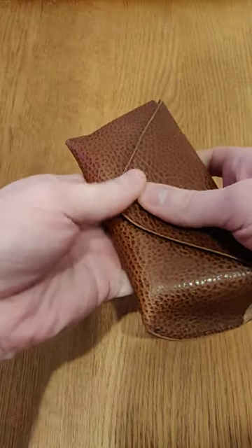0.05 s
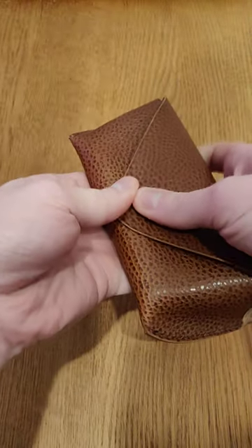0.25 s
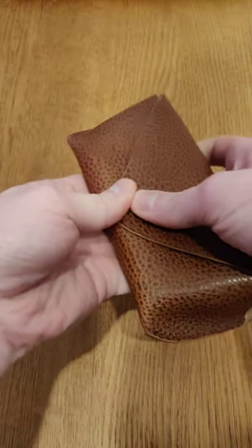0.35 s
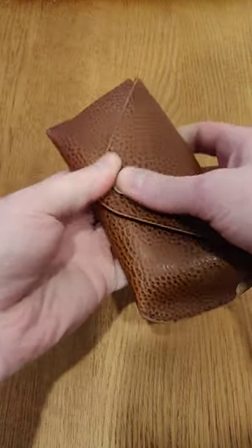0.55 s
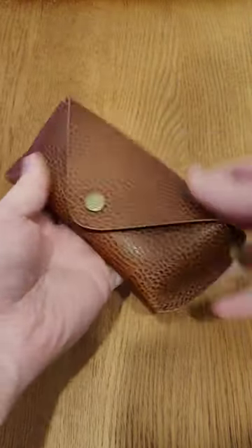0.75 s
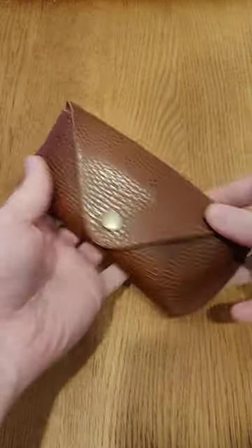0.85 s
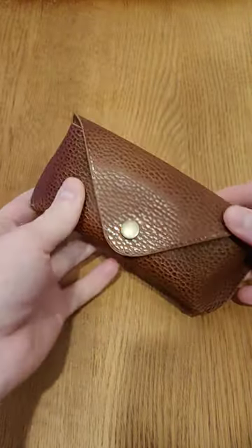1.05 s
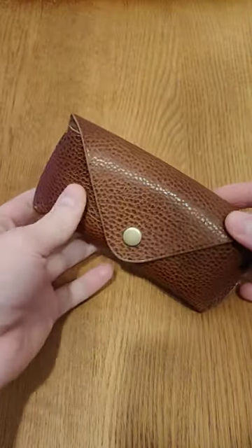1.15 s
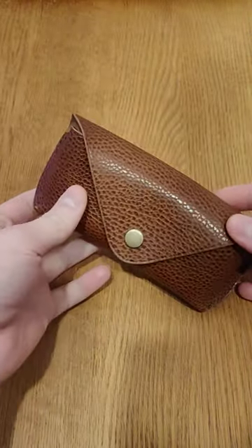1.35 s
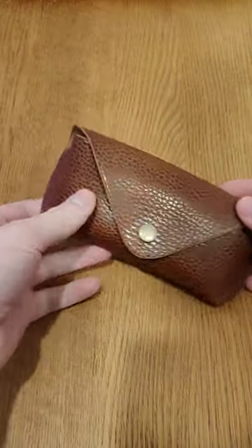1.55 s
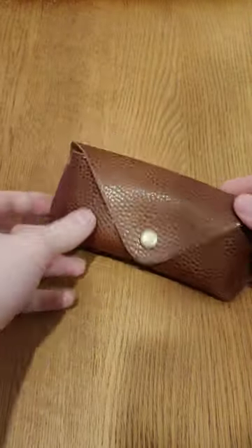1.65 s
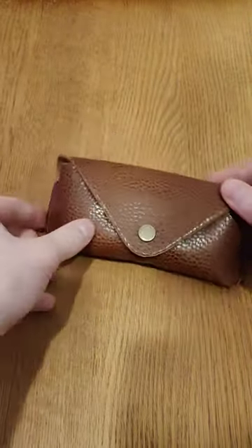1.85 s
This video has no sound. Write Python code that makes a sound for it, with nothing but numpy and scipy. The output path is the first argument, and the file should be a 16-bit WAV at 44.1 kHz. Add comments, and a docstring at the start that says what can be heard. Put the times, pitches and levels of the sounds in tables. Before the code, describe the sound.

Two sharp clicks as a leather case's snap is pressed closed, then soft handling.

```python
"""Snapping a leather case shut

A quiet room with mains hum; a phone's two microphones sit close to a hollow leather case above a
wooden table. Two thumbs press its metal snap stud, which slips home in two bursts of ticks that ring
the stud and the case. The room answers, then fingers turn the case and rub the grained leather."""
import sys
import numpy as np
from scipy import signal
from scipy.fft import rfft, irfft
from scipy.io import wavfile
from scipy.ndimage import uniform_filter1d, minimum_filter1d

SR = 44100
rng = np.random.default_rng(int(sys.argv[2]) if len(sys.argv) > 2 else 0)


def file_out(sig):
    """Save sig as 16-bit WAV at sys.argv[1]."""
    # one column per channel
    cols = np.atleast_2d(sig).T
    # limit, then scale
    lim = np.clip(cols, -1, 1)
    pcm = np.round(lim * 32767).astype(np.int16)
    wavfile.write(sys.argv[1], SR, pcm)


N = 83790

# Spectrum of the room tone: freq_hz, relative_db
TONE_COLOUR = [(25, -3.5), (40, -12.5), (65, -19), (130, -13.5), (170, -19.5), (260, -15.5), (500, -28.5),
               (900, -28.5), (2000, -35), (4000, -32.5), (5600, -33), (8000, -38), (10000, -44),
               (15500, -38.5)]
# How alike the two microphones hear the room tone: freq_hz, correlation
TONE_LIKENESS = [(60, 0.32), (240, 0.41), (950, 0.073), (3770, 0.01), (15000, 0.01)]
# Balance of the room tone (pan is always left minus right): freq_hz, pan_db
TONE_PAN = [(60, 1.5), (300, 0.5), (1650, 0), (15000, -0.5)]
# Decay of the room's reflections: freq_hz, t60_s
ROOM_DECAY = [(250, 0.42), (660, 0.43), (1740, 0.44), (4590, 0.48), (12100, 0.27)]
# Spectrum of the reflections: freq_hz, gain_db
ROOM_COLOUR = [(200, -2), (400, -4.5), (700, -4.5), (1300, -10.5), (2300, -8), (3700, -9), (5200, -12),
               (8000, -8.5), (15000, -14)]
# Finger scuffs on the leather: peak_s, rise_s, fall_s, case_db, treble_db
SCUFFS = [(0.025, 0.044, 0.1, -58, -53.5), (0.147, 0.048, 0.074, -56, -62.5),
          (0.207, 0.046, 0.13, -53.5, -58), (0.658, 0.33, 0.16, -62, -58.5),
          (0.813, 0.16, 0.032, -59.5, -57), (0.864, 0.0053, 0.062, -49, -51),
          (1.04, 0.075, 0.061, -55.5, -50.5), (1.12, 0.057, 0.45, -73.5, -71),
          (1.695, 0.042, 0.075, -48, -53), (1.8, 0.17, 0.22, -61.5, -64.5), (1.877, 0.019, 0.062, -57, -71)]
# Rubbing heard through the case: freq_hz, relative_db
RUB_CASE = [(300, -23), (700, 11.5), (1000, -3.5), (1500, -2.5), (2500, -26.5), (4000, -23)]
# Treble of the rubbing, heard directly: freq_hz, relative_db
RUB_TREBLE = [(1500, 0), (3000, 2), (4200, 1), (5700, 8.5), (7000, 0.5), (9000, -13.5), (12000, -40.5)]
# Balance of the rubbing: freq_hz, pan_db
RUB_PAN = [(700, 5), (1800, 0), (5500, 9), (7500, -5.5)]
# Ringing of stud and case as each microphone hears it: pitch_hz, level_db, t60_s, pan_db
STUD_MODES = [(3022, -5, .009, 1.5), (3974, -5.5, 0.011, 3.5), (4576, 0, 0.0066, 5),
              (5263, -2.5, 0.0063, 17), (5913, 0, 0.0049, 11.5), (6770, -4.5, 0.0031, -4.5),
              (7290, -10, 0.007, -7), (8300, -14, 0.0026, -12)]  # includes the left microphone's port resonance near 5.5 kHz
PING_MODES = [(9860, -24, 0.0024, -6), (12200, -29, 0.0028, -0.5), (14900, -22, .004, -9.5)]  # the stud's highest modes
FLAP_MODES = [(1154, -1, 0.0095, 2), (1576, -2, 0.0049, -0.5), (1878, -5.5, .005, 3)]
WALL_MODES = [(2298, -1, 0.015, 0.5), (1517, -5, 0.02, 3), (2510, -5, 0.007, 3)]
HOLLOW_MODES = [(538, -10, 0.018, -7), (655, -0.5, 0.018, 1.5), (730.4, 0.5, 0.019, 3),
                (980, -7.5, 0.016, -1)]
THUMP_MODES = [(378, -2, 0.026, 1), (265.1, -14, 0.037, 2)]
# Small creaks and finger taps on the case: start_s, bright_db, hollow_db
TAPS = [(0.1392, -53, -51), (.194, -49.5, -51), (.394, -28.5, -28.5), (.426, -38.5, -30.5),
        (.528, -39, -40.5), (.586, -44.5, -48), (0.6166, -50, -36.5), (.738, -49.5, -44),
        (.779, -74, -44.5), (.8615, -54.5, -40.5), (.871, -58, -34.5), (0.883, -75, -37.5),
        (1.038, -61, -35), (1.096, -63, -43.5), (1.28, -72, -53), (1.684, -57, -42.5), (1.699, -52, -37.5),
        (1.875, -76, -38.5)]
# Slips of the stud's spring: start_s, stud_db, ping_db, flap_db, wall_db, hollow_db, thump_db
SLIPS = [(0.2278, -21, -34, -17.5, -18.5, -18, -16.5), (0.2297, -9.5, -25, -12, -15, -18, -21.5),
         (0.2307, -21, -30, -18.5, -22, -39.5, -17.5), (0.2322, -17.5, -24.5, -27.5, -28.5, -33, -22),
         (0.296, -33, -49, -42, -36.5, -51, -58.5), (0.324, -36.5, -55, -41, -40.5, -52, -57),
         (0.352, -28, -42, -38.5, -35.5, -62, -62.5), (.3733, -15.5, -21.5, -23.5, -13, -10, -41),
         (0.3741, -6, -4.5, -21.5, -11, -8.5, -36.5), (.3757, -13.5, -19.5, -11.5, -20, -15.5, -37),
         (.3772, -14, -27, -32, -28, -21.5, -34)]

PAN_SHARE = np.array([[.5], [-.5]])  # half of a pan to each microphone: left, right


def amp(db):
    """Decibels to gain."""
    return 10 ** (np.asarray(db) / 20)


def unit_rms(x):
    """Scales to rms 1."""
    return x / np.sqrt(np.mean(x ** 2) + 1e-20)


def curve_at(points, hz):
    """Reads a table on a log-frequency axis."""
    point_hz, value = np.transpose(points)
    return np.interp(np.log(hz + 1), np.log(point_hz + 1), value)


def coloured(x, points):
    """Filters by a spectrum in dB that falls away beyond its ends."""
    hz = np.fft.rfftfreq(x.shape[-1], 1 / SR)
    skirted = [(points[0][0] / 2, -50), *points, (points[-1][0] * 2, -60)]
    return irfft(rfft(x) * amp(curve_at(skirted, hz)), x.shape[-1])


def room_tone(noise_db=-58.5, hum_db=-68.5, hum_hz=101.1, hum_width_hz=6.1):
    """Steady noise of room and microphones, partly alike in the bass, with a wavering mains hum."""
    hz = np.fft.rfftfreq(N, 1 / SR)
    left, unrelated = rfft(rng.standard_normal((2, N)))
    likeness = curve_at(TONE_LIKENESS, hz)
    right = likeness * left + np.sqrt(1 - likeness ** 2) * unrelated
    spectrum_db = curve_at(TONE_COLOUR, hz) + PAN_SHARE * curve_at(TONE_PAN, hz)
    noise = irfft(np.array([left, right]) * amp(spectrum_db), N)
    hum_band = 1 / (1 + ((hz - hum_hz) / hum_width_hz) ** 2)
    hum = irfft(rfft(rng.standard_normal(N)) * hum_band, N)
    return amp(noise_db) * unit_rms(noise) + amp(hum_db) * unit_rms(hum)


def reflections(x, gap_s=0.00208, build_s=0.0046):
    """Dense room echoes, new for each call and microphone, every band dying at its own speed."""
    size = SR * 3 // 4
    hz, frame_s, bands = signal.stft(rng.standard_normal((2, size)), SR, nperseg=128)
    decay = amp(-60 * frame_s / curve_at(ROOM_DECAY, hz)[:, None])
    tail = signal.istft(bands * decay, SR, nperseg=128)[1][:, :size]
    tail *= np.clip((np.arange(size) / SR - gap_s) / build_s, 0, 1)
    tail = coloured(tail / np.linalg.norm(tail[0]), ROOM_COLOUR)
    return signal.fftconvolve(x, tail, axes=1)[:, :N]


def leather_rubbing(grains_per_s=9000, spread_db=1.9, likeness=0.25):
    """Skin catching on the leather grain: dense uneven clicks, heard through the case and directly."""
    t, out = np.arange(N) / SR, np.zeros((2, N))
    peak_s, rise_s, fall_s, case_db, treble_db = np.transpose(SCUFFS)[:, :, None]
    coarse_s = t[::32]
    # Each scuff climbs 17 dB over its rise and drops as much over its fall.
    swell_db = 17 * np.minimum((coarse_s - peak_s) / rise_s, (peak_s - coarse_s) / fall_s)
    for peak_db, colour in [(case_db, RUB_CASE), (treble_db, RUB_TREBLE)]:
        grains = rng.standard_normal((2, N))
        grains *= amp(spread_db * np.minimum(rng.exponential(1, (2, N)), 4))
        grains *= rng.random((2, N)) < grains_per_s / SR
        grains[1] = likeness * grains[0] + np.sqrt(1 - likeness ** 2) * grains[1]
        power = (amp(peak_db + swell_db) ** 2).sum(0)
        out += unit_rms(coloured(grains, colour)) * np.interp(t, coarse_s, np.sqrt(power))
    pan_db = PAN_SHARE * curve_at(RUB_PAN, np.fft.rfftfreq(N, 1 / SR))
    return irfft(rfft(out) * amp(pan_db), N)


def ring(modes, right_lag_s=0.00009):
    """One tick close up: dying sines of alternate sign, reaching the right microphone later."""
    hz, level_db, t60_s, pan_db = np.transpose(modes)[:, :, None]
    arrival_s = np.array([0, right_lag_s])[:, None, None]
    t = np.maximum(np.arange(2048) / SR - arrival_s, 0)
    sign = (-1.) ** np.arange(len(hz))[:, None]
    envelope = amp(level_db + PAN_SHARE[:, None] * pan_db - 60 * t / t60_s)
    return (sign * envelope * np.sin(2 * np.pi * hz * t)).sum(1)


def through_leather(x, low_hz=195, high_hz=8620):
    """The small case radiates no deep bass and the leather swallows the top."""
    bass_cut = signal.butter(4, low_hz, "high", fs=SR, output="sos")
    treble_cut = signal.butter(8, high_hz, "low", fs=SR, output="sos")
    return signal.sosfilt(treble_cut, signal.sosfilt(bass_cut, x))


def struck(times_s, levels_db, response):
    """The same ring laid down at each time, at that strike's level."""
    size = response.shape[1]
    out = np.zeros((2, N + size))
    for start_s, gain in zip(times_s, amp(levels_db)):
        start = round(start_s * SR)
        out[:, start:start + size] += gain * response
    return out[:, :N]


def finger_taps(bright, hollow, thump, landing_s=0.0037):
    """Creaks and taps ring the bright modes at once, the low ones softly as the fingertip lands."""
    start_s, bright_db, hollow_db = np.transpose(TAPS)
    landing = np.minimum(np.arange(hollow.shape[1]) / SR / landing_s, 1)
    soft_knock = (hollow + amp(-7) * thump) * landing
    return struck(start_s, bright_db, bright) + struck(start_s, hollow_db, soft_knock)


def stud_slips(*parts):
    """Each slip of the stud's spring rings every part of stud and case by its own amount."""
    start_s, *parts_db = np.transpose(SLIPS)
    return sum(struck(start_s, level_db, part) for level_db, part in zip(parts_db, parts))


def scene(second_snap_s=0.36, first_echo_db=-1.5):
    """Close ticks and rubbing in front, the room's answer and its steady tone behind."""
    damped_modes = STUD_MODES, FLAP_MODES, WALL_MODES, HOLLOW_MODES, THUMP_MODES
    stud, flap, wall, hollow, thump = [through_leather(ring(modes)) for modes in damped_modes]
    ticks = stud_slips(stud, ring(PING_MODES), flap, wall, hollow, thump)
    ticks += finger_taps(stud + flap + wall, hollow, thump)
    # Each snap gets its own room echoes; the first snap's are slightly quieter.
    early = np.arange(N) < second_snap_s * SR
    room = amp(first_echo_db) * reflections(ticks * early) + reflections(ticks * ~early)
    return ticks + room + leather_rubbing() + room_tone()


def record(dry, ceiling=0.87, cutoff_hz=16150):
    """The phone's look-ahead limiter smoothly lowers the loudest peaks; a low-pass trims the top."""
    needed_gain = np.minimum(ceiling / (abs(dry).max(0) + 1e-9), 1)
    held_gain = minimum_filter1d(needed_gain, size=129)
    smooth_gain = uniform_filter1d(uniform_filter1d(held_gain, size=64), size=64)
    low_pass = signal.firwin(511, cutoff_hz, window=("kaiser", 9), fs=SR)
    return signal.oaconvolve(dry * smooth_gain, low_pass[None], "same")


dry = scene()
out = record(dry)
file_out(out)
```